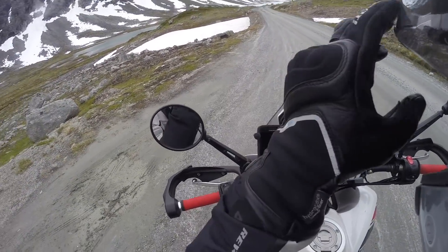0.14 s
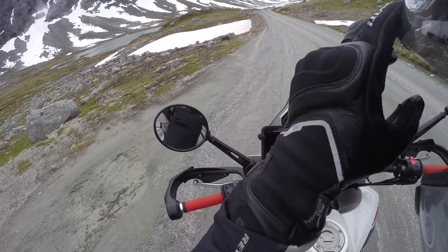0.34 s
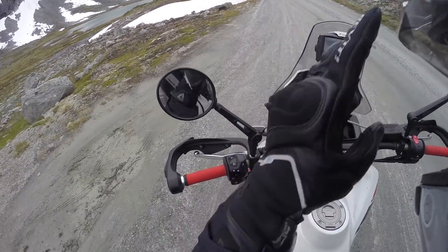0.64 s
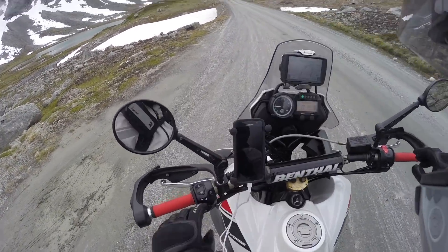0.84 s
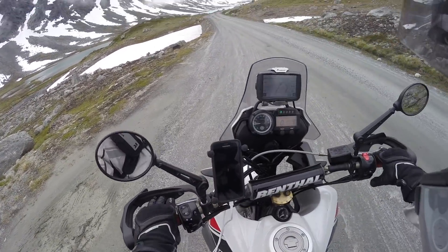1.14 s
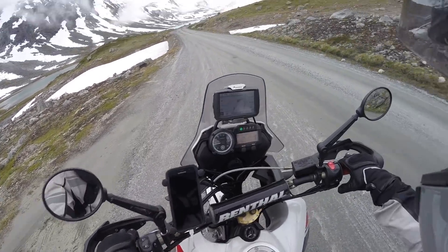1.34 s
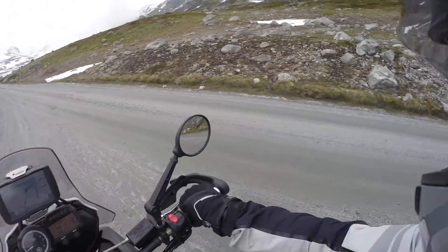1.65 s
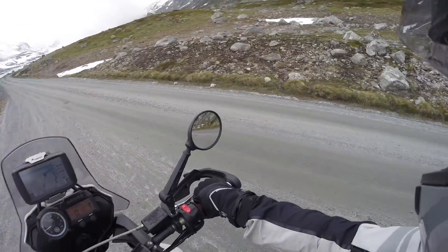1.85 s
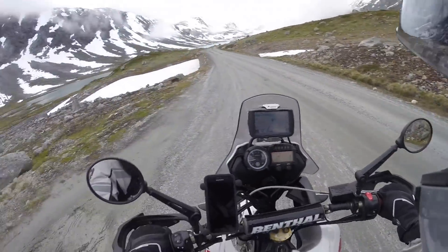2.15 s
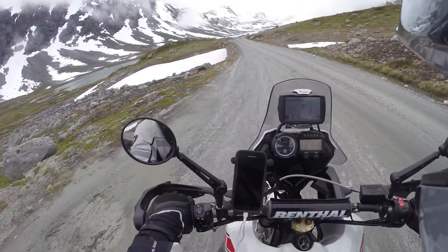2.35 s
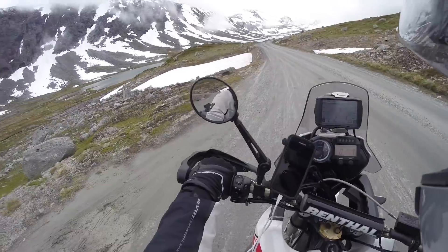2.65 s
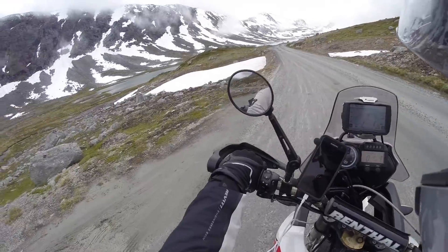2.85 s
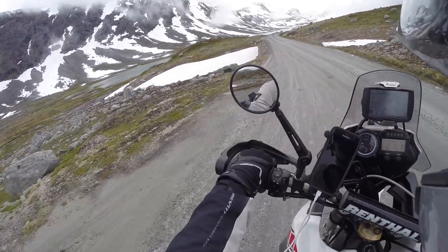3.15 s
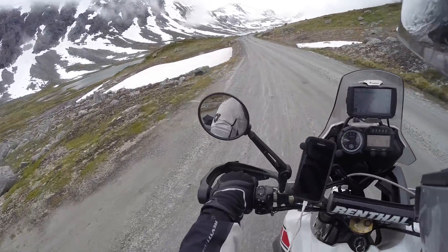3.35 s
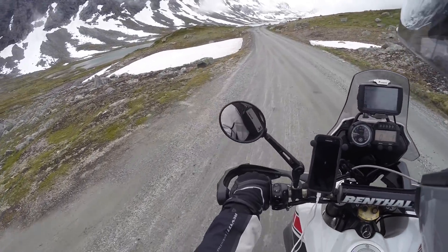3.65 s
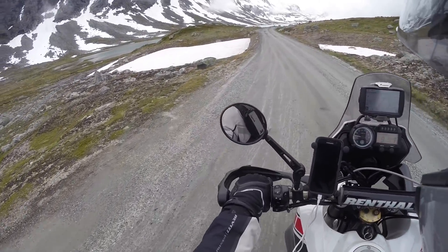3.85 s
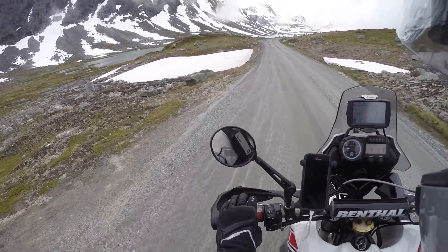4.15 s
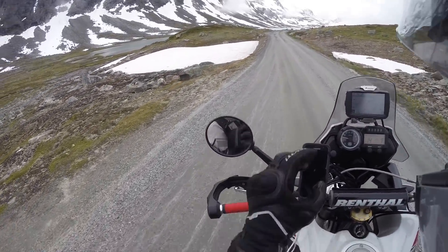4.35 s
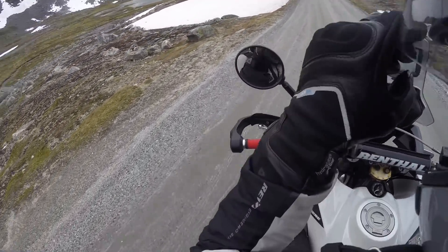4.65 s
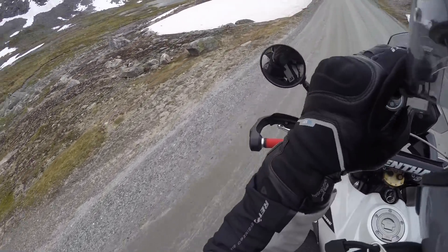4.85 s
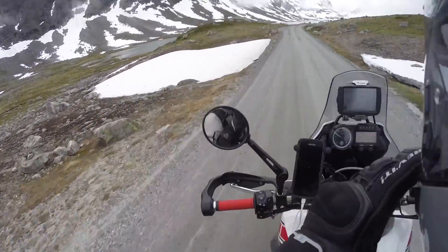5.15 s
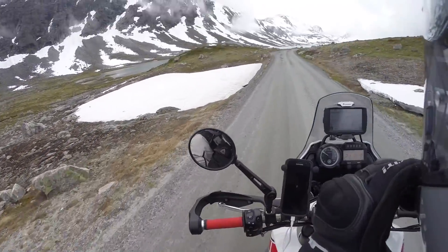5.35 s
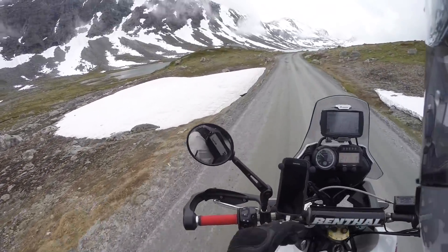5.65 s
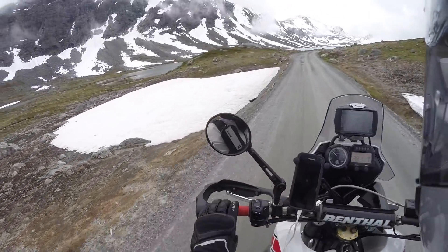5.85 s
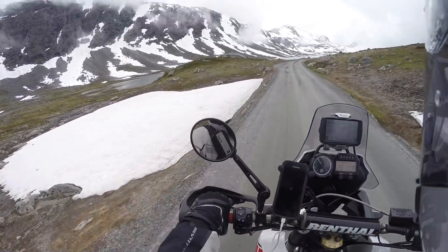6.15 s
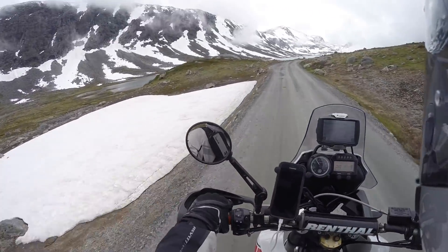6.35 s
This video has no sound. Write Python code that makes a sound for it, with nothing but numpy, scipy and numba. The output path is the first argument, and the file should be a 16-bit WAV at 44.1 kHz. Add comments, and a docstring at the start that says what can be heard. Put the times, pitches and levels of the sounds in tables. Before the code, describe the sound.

A big single-cylinder motorcycle idles lumpily with glove knocks, pulls away honking and speeds up, then a visor clacks shut and wind builds.

```python
"""A big single-cylinder motorcycle idles, pulls away and speeds up, heard at two ports on the rider's helmet.
Firings ring the exhaust pipe; the intake honks under throttle; the engine clatters as pulsed, filtered noise.
Wind is low noise with gusts. A glove rubs and knocks the helmet and shuts the visor; air thumps the ports.
Short squeaks fall in pitch as the clutch bites. Gain control ducks peaks and soft clipping rounds the rest.
"""
import sys
import numpy as np
from scipy import signal
from scipy.fft import rfft, irfft, next_fast_len
from scipy.io import wavfile
from scipy.ndimage import uniform_filter1d
from numba import njit

SR = 44100
rng = np.random.default_rng(int(sys.argv[2]) if len(sys.argv) > 2 else 0)


def materialize(psi):
    """Save the field psi as 16-bit PCM at rate SR to the path in sys.argv[1].

    A 1-D psi becomes a single channel; in a 2-D psi each row is a channel.
    """
    bounded = np.clip(np.atleast_2d(psi).T, -1, 1)
    quanta = np.round(bounded * 32767).astype(np.int16)
    wavfile.write(sys.argv[1], SR, quanta)


N = 286071

# All levels in dB are relative within their source unless stated otherwise.
# Engine speed. Each row: time in seconds, firings per second.
SPEED_CURVE = [(0.0, 12.73), (0.56, 13.1), (0.79, 13.91), (1.13, 12.94), (1.7, 12.84), (2.15, 13.41),
               (2.31, 18.96), (2.52, 19.16), (3.05, 20.32), (3.45, 17.95), (3.62, 15.74), (3.89, 18.33),
               (4.2, 21.6), (4.53, 24.4), (4.96, 27.4), (5.39, 30), (5.63, 31.9), (5.96, 33.5),
               (6.49, 35.9)]
# Throttle. Each row: time in seconds, opening 0-1, pipe pitch factor as the gas heats,
# factor on the pipe's t60, intake level in dB.
THROTTLE_CURVE = [(0, 0, 1, 1, -14), (2.15, 0, 1, 1, -14), (2.35, .95, .97, 1, -9), (3.1, .95, .97, 1, -8),
                  (3.5, .85, .94, 1, -9), (3.8, .9, .93, 1, -10), (4.3, .95, 1.02, 1.6, -3),
                  (4.6, .95, 1.025, 2.4, -3), (6.49, .95, 1.033, 2.4, -4)]
# Engine levels. Each row: time in seconds, exhaust level in dB, clatter level in dB.
ENGINE_LEVELS = [(0, -20.5, -32.5), (0.9, -21.5, -31.5), (1.2, -21, -33), (1.5, -22, -33.5),
                 (1.8, -25, -35), (2.1, -18, -31.5), (2.3, -22.5, -32), (2.5, -19.5, -28),
                 (2.9, -22.5, -29.5), (3.35, -22, -32), (3.6, -22.5, -31.5), (3.8, -21, -30),
                 (4.0, -26.5, -34.5), (4.2, -28.5, -32.5), (4.33, -24, -26), (4.6, -37, -31),
                 (4.8, -25.5, -20), (4.9, -30.5, -24), (5.12, -37, -37.5), (5.4, -32.5, -35),
                 (5.7, -28, -35.5), (5.9, -28, -31), (6.1, -25.5, -29), (6.33, -23.5, -26),
                 (6.49, -27, -25.5)]
# Treble against the clatter. Each row: time in seconds, level in dB.
TREBLE_LEVELS = [(0, -3.5), (1.2, -5), (2.1, -2.5), (2.4, -7.5), (3.5, -7), (4.2, -5.5), (4.6, -6.5),
                 (5.1, -7.5), (5.7, -4), (6.0, -6), (6.2, -7.5), (6.49, -6)]
# Exhaust modes. Each row: base frequency in Hz, base t60 in seconds, level in dB at shut throttle,
# level in dB at open throttle, polarity.
PIPE_MODES = [(77.4, 0.084, -10, -40, 1), (95, 0.11, -21, -17, 1), (140, 0.16, -9, -18.5, -1),
              (163, 0.019, 3.5, -40, 1), (232.3, 0.11, -8, -40, 1), (244, 0.036, -42, -2, 1),
              (318, 0.06, -41, -18.5, 1)]
# Intake modes. Each row: base frequency in Hz, t60 in seconds, level in dB with visor open, level in dB shut.
INTAKE_MODES = [(382, 0.15, -30, -11), (542, 0.15, 3, -19)]
# Casing modes struck by gulp and slam. Each row: frequency in Hz, t60 in seconds, level in dB.
CASING_MODES = [(770, 0.095, -15), (1070, 0.17, -19), (1292, 0.058, -4.5)]
# Airbox boom. Each row: time in seconds, level in dB.
BOOM_LEVELS = [(4.25, -30), (4.55, 0), (5.1, 0), (5.2, -30)]
# Valve ticks. Each row: place in the cycle 0-1, level in dB idling, level in dB pulling in the mids,
# level in dB pulling in the treble.
VALVE_TICKS = [(0.09, 6, -10, -10), (.3, -10, -10, 8), (0.504, 7, 10, 5), (.7, 0, -3, -7), (0.904, 1, 4, 3),
               (.98, -3, 7, 4)]
# Clatter spectrum through the helmet. Each row: frequency in Hz, spectral level in dB.
SHELL_SPECTRUM = [(180, 29), (300, -4.5), (410, -3.5), (500, 1.5), (906, -9.5), (1090, -7.5), (1560, -18.5),
                  (2210, -25.5), (3070, -28), (3940, -32), (4720, -31), (9280, -36.5), (12500, -40.5),
                  (14000, -46.5), (15500, -99)]
# Likeness of the two ports. Each row: frequency in Hz, likeness (clipped to 0-1).
PORT_LIKENESS = [(300, 5), (640, 13), (1400, 0.3), (3000, .5), (7000, 0.38), (15000, -0.5)]
# Balance of the clatter. Each row: frequency in Hz, left minus right in dB.
PORT_LEAN = [(60, 0.5), (110, 10), (200, -2), (380, -0.5), (700, -2.0), (1290, -6.5), (2380, 2), (4400, 1),
             (8120, 4.5), (15000, 1)]
# Helmet shell modes. Each row: frequency in Hz, level in dB, t60 in seconds.
HELMET_MODES = [(605, 2.5, 0.022), (1393, 8.5, 0.0053), (1940, 3, 0.0046), (2630, -4, 0.003),
                (3390, -16.5, 0.0092), (4720, -15, 0.0023)]
# Glove knocks. Each row: start in seconds, level in dB, t60 of the noise in seconds,
# left minus right in dB, hardness in dB per octave.
GLOVE_KNOCKS = [(0.2613, -6, 0.03, -4, 3), (1.4351, -22.5, 0.023, -1.5, 0), (1.553, -21.5, 0.55, -9, 0),
                (1.717, -19.5, 0.068, 6, 0), (1.7275, -9.5, 0.04, 2, 0), (2.098, -17, 0.02, -8, 1.5),
                (4.692, -21, 0.031, -9, 0), (4.732, -18, 0.044, 3, 0), (4.7874, 6, 0.022, 6, -1.5),
                (4.7925, -3, 0.019, 6, -1.5), (4.9563, -13.5, 0.076, 1, -1.5), (5.043, -13, 0.024, 3, 1.5),
                (5.0555, -12, 0.02, -2, 0), (5.0585, -3, 0.022, -2, 0), (5.067, -20, .02, 0, 0),
                (5.087, -22, 0.021, 3, 1.5), (5.0984, -5, 0.013, -2.5, 0), (5.1018, -11, .025, 5, 1.5),
                (5.127, -9.5, 0.049, 3, 0), (5.375, -31, 0.036, -7, 1.5), (5.419, -25, 0.027, -12, 0),
                (5.4385, -32, .02, 2, 1.5), (5.444, -27, 0.03, -3, 1.5), (5.452, -27, .015, 0, 1.5),
                (5.459, -8, 0.018, -8, 1.5), (5.5614, -21.5, 0.016, -13, 0), (5.5776, -26.5, 0.098, 1, 1.5),
                (6.417, -31, 0.067, -17, 0)]
# Cloth rubs. Each row: start in seconds, length in seconds, level in dB.
CLOTH_RUBS = [(0.034, 0.66, -37), (1.487, 0.23, -34.5), (4.592, 0.32, -37), (4.9, 0.23, -33.5)]
# Blows of pressure on the ports. Each row: start in seconds, level in dB, time scale in seconds,
# direction (1 push, -1 pull).
PRESSURE_THUMPS = [(0.263, -2, .004, 1), (3.556, 6, 0.0053, 1), (4.011, 2, 0.0081, 1),
                   (4.412, 12, 0.005, -1), (5.048, 1, 0.0013, 1), (5.1276, 13.5, 0.0011, 1),
                   (5.46, 11, 0.001, -1), (5.749, -5, 0.0022, -1), (5.8355, -8, 0.0017, 1),
                   (5.891, -4, 0.0013, -1), (5.8978, 0, 0.0023, 1), (6.011, -3, 0.0013, -1),
                   (6.016, -5, 0.0013, 1), (6.034, 3, 0.0028, 1), (6.079, -5, 0.0024, 1),
                   (6.163, -6, 0.0015, 1), (6.262, 1, 0.0013, -1), (6.331, 3.5, 0.0027, 1),
                   (6.385, 4, 0.0036, 1), (6.4195, 6, 0.0024, 1)]
# Roar of the air stream. Each row: time in seconds, level in dB.
ROAR_LEVELS = [(0, -31), (3, -31), (3.6, -25.5), (4.1, -25), (4.4, -22), (4.7, -24.5), (5.05, -27.5),
               (5.3, -24.5), (5.7, -23.5), (6.0, -19), (6.49, -14)]
# Strong gusts. Each row: centre in seconds, level in dB, half length in seconds (down to 1/e).
STRONG_GUSTS = [(1.202, -16, 0.32), (3.447, -18, 1), (4.046, -31, 0.072), (4.397, -12, 0.15),
                (4.9, -37, 0.14), (5.39, -22.5, 0.074), (5.906, -24, 0.17), (6.37, -19, 0.15)]
# Squeaks as the clutch bites. Each row: start in seconds, level in dB, start frequency in Hz,
# fall in Hz per second, length in seconds.
CLUTCH_SQUEAKS = [(2.008, -29, 1290, 1500, .025), (2.082, -27, 1270, 100, .02),
                  (2.157, -26, 1360, 4600, .065)]

PORT_LAG_SAMPLES = 4
CYCLE_AT_START = .342
LOAD_SCATTER = .3  # share of the idle scatter left at full throttle
GULP_AT_CYCLE, SLAM_AT_CYCLE = -.478, -.035  # intake gulp, intake valve slam
HONK_FLAT, HONK_SLIDE_S = 0.42, 0.0051  # starts this fraction flat, slides up as the valve closes
SLAM_HZ, SLAM_T60_S, SLAM_DB = 432, 0.036, 6
BOOM_HZ, BOOM_T60_S = 174, .12
SHAKE_DB = -2  # against the exhaust level curve
TICKS_BLUR_HZ = 23.6  # firings per second where the ticks blur into the rattle
PULL_HOLLOW_DB, SHUT_HOLLOW_DB = -6, -4.0  # 700 Hz band: full throttle, visor shut
VISOR_SHUTS_S = 5.12, 5.14
SHUT_EXHAUST_DB, SHUT_CLATTER_DB, SHUT_TREBLE_DB, SHUT_BUFFET_DB = -5.5, -4.5, -3.5, -22
SHUT_RASP_DB, SHUT_HISS_DB = 1.5, -5.5  # 2.8 kHz and 11.2 kHz bands
BUFFET_DB = 6  # above the roar curve
RUB_FADE_S = 0.024
LIMIT_DB, ATTACK_S, RELEASE_S = -3, .0004, 0.13
TOP_HZ = 15300


def undb(db):
    """Decibels to amplitude."""
    return 10 ** (np.asarray(db) / 20)


def unit(x):
    """Scale to unit RMS."""
    return x / np.sqrt(np.mean(x ** 2))


def curve(s, v):
    """Straight lines between points, at every sample."""
    return np.interp(np.arange(N) / SR, s, v)


def on_log(hz, table):
    """Table value on a log frequency axis."""
    table_hz, value = np.transpose(table)
    return np.interp(np.log(hz), np.log(table_hz), value)


@njit
def ring(x, pole):
    """A decaying mode struck by x; its pole may move."""
    y, z = np.empty(len(x)), 0j
    for i in range(len(x)):
        z = z * pole[i] + x[i] + 1e-18
        y[i] = z.imag
    return y


def mode(x, hz, t60_s):
    """A resonance of given pitch, falling 60 dB in t60."""
    pole = np.exp(2j * np.pi * hz / SR - np.log(1000) / (t60_s * SR))
    return ring(x, pole * np.ones(len(x)))


def clicks(s, size):
    """Pulses of given size at times s, shared between neighbouring samples."""
    at = np.clip(s * SR, 0, N - 2)
    k = at.astype(int)
    kept = size * (s > 0) * (s * SR < N - 2)
    return np.bincount(k, kept * (1 - at + k), N) + np.bincount(k + 1, kept * (at - k), N)


def walk(rate_hz):
    """Random levels held for 1 / rate and slewed twice; spread near 1."""
    k = int(SR / rate_hz)
    steps = np.repeat(rng.standard_normal(N // k + 1), k)
    return 1.3 * uniform_filter1d(uniform_filter1d(steps, k), k)[:N]


def ports(x):
    """The right port hears a source a few samples late."""
    return np.array([x, np.roll(x, PORT_LAG_SAMPLES)])


def butter(x, order, hz, kind="low"):
    """Butterworth filter."""
    return signal.sosfilt(signal.butter(order, hz, kind, fs=SR, output="sos"), x)


def cycles():
    """Firing cycles so far at every sample: the integral of engine speed."""
    return CYCLE_AT_START + np.cumsum(curve(*np.transpose(SPEED_CURVE))) / SR


def firings(place=0.):
    """Times at which each cycle passes the given place."""
    count = cycles()
    return np.interp(np.arange(int(count[-1]) + 1) + place, count, np.arange(N) / SR)


def throttle_at(s):
    """Throttle opening at times s."""
    return np.interp(s, *np.transpose(THROTTLE_CURVE)[:2])


def shut():
    """0 while the visor is open, 1 once it is shut."""
    return curve(VISOR_SHUTS_S, (0, 1))


def gusts():
    """Strength of the gusts: each swells and sinks like a bell."""
    t = np.arange(N) / SR
    return sum(undb(db) * np.exp(-((t - s) / half_s) ** 2) for s, db, half_s in STRONG_GUSTS)


def wind(speed_db):
    """Gusty low buffeting, partly the same on both ports, plus a rougher roar that reaches higher in pitch."""
    mid, side = rng.standard_normal((2, N))
    spread = 0.5 * side * np.array([[1], [-1]])
    low = butter(mid + spread, 2, [14, 55], "band")
    roar = butter(mid + 0.36 * spread, 1, [40, 115], "band")
    roar = butter(roar, 3, 340)
    buffet = np.hypot(undb(speed_db + BUFFET_DB + SHUT_BUFFET_DB * shut()), gusts())
    buffeting = unit(low) * buffet * undb(2.0 * walk(9.3))
    return buffeting + unit(roar) * undb(speed_db + 3.0 * walk(30))


def thumps():
    """One-sided pushes or pulls of air with a slight rebound."""
    out = np.zeros(N + 4410)
    for s, db, scale_s, sign in PRESSURE_THUMPS:
        k, t = int(s * SR), np.arange(4410) / SR / scale_s
        out[k:k + len(t)] += np.sign(sign) * undb(db) * (t * np.exp(1 - t)) ** 2 * (1 - 0.38 * t)
    return ports(out[:N])


def helmet(grit, hard_db):
    """Shell modes struck by noise; hardness tilts them about 1 kHz."""
    return sum(undb(db + hard_db * np.log2(hz / 1000)) * mode(grit, hz, t60_s)
               for hz, db, t60_s in HELMET_MODES)


def glove():
    """Scratchy knocks: a burst of noise coloured by the shell, with a bright edge."""
    out, t = np.zeros((2, N + 4410)), np.arange(4410) / SR
    for s, db, t60_s, pan_db, hard_db in GLOVE_KNOCKS:
        envelope = np.exp(-np.log(1000) * t / t60_s) * np.minimum(t / 0.0016, 1) ** 2
        grit = rng.standard_normal((2, len(t))) * envelope
        grit[0] = .7 * grit[1] + .7 * grit[0]  # ports partly alike
        body = np.array([helmet(g, hard_db) for g in grit])
        edge = butter(grit, 2, 8000)
        burst = body / np.abs(body).max() + undb(-13.5 + hard_db) * edge
        k = int(s * SR)
        out[:, k:k + len(t)] += burst * undb(db + np.array([[pan_db], [-pan_db]]) / 2)
    return out[:, :N]


def rubs():
    """Strength of the cloth rubbing: each rub fades in, holds and fades out."""
    t = np.arange(N) / SR
    return sum(undb(db) * np.clip(np.minimum(t - s, s + length_s - t) / RUB_FADE_S, 0, 1)
               for s, length_s, db in CLOTH_RUBS)


def squeaks():
    """Falling whistles that start quickly and fade."""
    out = np.zeros(N)
    for s, db, hz, fall, length_s in CLUTCH_SQUEAKS:
        k, t = int(s * SR), np.arange(int(length_s * SR)) / SR
        envelope = np.sin(np.pi * np.sqrt(t / length_s))
        out[k:k + len(t)] += undb(db) * envelope * np.sin(2 * np.pi * (hz - fall * t / 2) * t)
    return ports(out)


def valves():
    """Envelopes of the valve gear in mids and treble: uneven ticks that die in milliseconds."""
    ticks = 0
    for place, idle_db, mid_db, top_db in VALVE_TICKS:
        when = firings(place)
        time_scatter, level_scatter = rng.standard_normal((2, len(when)))
        opening = throttle_at(when)
        jittered = when + .001 * time_scatter
        ticks = ticks + np.array([
            clicks(jittered, undb(idle_db + (db - idle_db) * opening + 1.1 * level_scatter))
            for db in (mid_db, top_db)])
    decay = np.exp(-1 / (.005 * SR))
    return signal.lfilter([1], [1, -decay], uniform_filter1d(ticks, 90))


def shell_noise(hz, size):
    """Spectra of noise through the helmet: alike on both ports in the lows, less so in the highs."""
    like = np.clip(on_log(hz, PORT_LIKENESS), 0, 1)
    one, other = (rfft(rng.standard_normal(size)) for _ in range(2))
    late = np.exp(-2j * np.pi * hz * PORT_LAG_SAMPLES / SR)
    lean = undb(on_log(hz, PORT_LEAN) / 2)
    left = lean * (like * one + np.sqrt(1 - like ** 2) * other)
    return np.array([left, late * one / lean]) * undb(on_log(hz, SHELL_SPECTRUM))


def clatter(clatter_db, treble_db):
    """Engine noise in octave bands, pulsing with cycle and valve ticks; cloth rubs add to the treble."""
    once_a_cycle = np.cos(2 * np.pi * (cycles() - .75))
    ticks = valves() / (1 + (curve(*np.transpose(SPEED_CURVE)) / TICKS_BLUR_HZ) ** 4)
    opening, visor = throttle_at(np.arange(N) / SR), shut()
    size = next_fast_len(N)
    hz = np.maximum(np.arange(size // 2 + 1) * SR / size, 1)
    pair = shell_noise(hz, size)
    low, high, shared = 0, 0, walk(30)
    for centre_hz in 350 * 2. ** np.arange(6):
        window = np.cos(np.pi / 2 * np.clip(np.log2(hz / centre_hz), -1, 1)) ** 2
        band = irfft(pair * window, size)[:, :N]
        treble = centre_hz > 2000
        flutter_db = 1.42 * once_a_cycle + (.5 if treble else .7) * shared + .8 * walk(12)
        band = band * undb(flutter_db) * (1 + (1.3 if treble else .9) * ticks[int(treble)])
        band = band * undb({2800: SHUT_RASP_DB, 11200: SHUT_HISS_DB}.get(centre_hz, 0) * visor)
        if centre_hz < 400:
            band = band * (1 - .8 * opening)  # the loose idle burble tightens under throttle
        if centre_hz == 700:
            # thins under throttle; the shut visor closes off the hollow of the helmet
            band = band * undb(PULL_HOLLOW_DB * opening + SHUT_HOLLOW_DB * visor)
        if treble:
            high = high + band
        else:
            low = low + band
    rustle = np.hypot(undb(treble_db), rubs())
    return unit(low) * undb(clatter_db + 3.5) + unit(high) * undb(-6.0) * rustle


def shake(exhaust_db):
    """The crank's once-a-turn shake, two turns a cycle, through the shut helmet."""
    return shut() * undb(exhaust_db + SHAKE_DB) * np.sin(2 * 2 * np.pi * cycles())


def intake(size, opening, scatter, pitch):
    """The gulp honks and slides up in pitch; the valve slam rings a mode of its own; both ring the casing."""
    s, intake_db = np.transpose(THROTTLE_CURVE)[[0, 4]]
    level_db = np.interp(firings(), s, intake_db) + 1.5 * scatter * rng.standard_normal(len(size))
    honk = size * opening * undb(level_db)
    t, gulp_s = np.arange(N) / SR, firings(GULP_AT_CYCLE)
    since_s = np.clip(t - gulp_s[np.searchsorted(gulp_s, t) - 1], 0, None)
    slide = pitch * (1 - HONK_FLAT * np.exp(-since_s / HONK_SLIDE_S))
    gulp, slam = clicks(gulp_s, honk), clicks(firings(SLAM_AT_CYCLE), honk)
    out = undb(SLAM_DB) * mode(slam, SLAM_HZ, SLAM_T60_S)
    for hz, t60_s, open_db, shut_db in INTAKE_MODES:
        out = out + undb(open_db + (shut_db - open_db) * shut()) * mode(gulp, hz * slide, t60_s)
    for hz, t60_s, db in CASING_MODES:
        out = out + undb(db) * mode(slam + gulp, hz, t60_s)
    return out


def airbox(when, size):
    """Firings boom the airbox."""
    boom = size * undb(np.interp(when, *np.transpose(BOOM_LEVELS)))
    return mode(clicks(when, boom), BOOM_HZ, BOOM_T60_S)


def pipe(when, size, opening, scatter, pitch, linger):
    """A puff per firing rings the pipe, leaves the tailpipe inverted and returns from the silencer."""
    # under throttle the hot gas runs faster down the pipe
    hurry = (.97 / np.interp(when * SR, np.arange(N), pitch)) ** (2 * opening)
    back = when + (.0077 - .0009 * opening) * hurry
    tail = (1.15 + .08 * opening) * undb(.8 * scatter * rng.standard_normal(len(when)))
    rebound, echo = when + .0094 * hurry, 1.7 * opening
    out = 0
    for hz, t60_s, shut_db, open_db, sign in PIPE_MODES:
        puff = sign * size * (undb(shut_db) * (1 - opening) + undb(open_db) * opening)
        strike = clicks(when, puff) - clicks(back, tail * puff) + clicks(rebound, echo * puff)
        out = out + mode(strike, hz * pitch, t60_s * linger)
    return out


def exhaust(level_db):
    """Each firing, slightly uneven in time and strength, drives pipe, intake and airbox."""
    s, _, pitch, linger, _ = np.transpose(THROTTLE_CURVE)
    pitch, linger = curve(s, pitch), curve(s, linger)
    when = firings()
    opening = throttle_at(when)
    scatter = 1 - (1 - LOAD_SCATTER) * opening
    time_scatter, level_scatter = scatter * rng.standard_normal((2, len(when)))
    when = when - .0079 - .0036 * opening + .0002 * time_scatter
    size = undb(np.interp(when * SR, np.arange(N), level_db) + .9 * level_scatter)
    out = pipe(when, size, opening, scatter, pitch, linger)
    out = out + intake(size, opening, scatter, pitch) + airbox(when, size)
    soft = np.exp(-1 / (.0006 * SR))  # the valve takes a moment to open
    return ports(undb(16.0) * signal.lfilter([1 - soft], [1, -soft], out))


def scene():
    """Air, glove and engine as the two ports hear them."""
    s, exhaust_db, clatter_db = np.transpose(ENGINE_LEVELS)
    exhaust_db, clatter_db = curve(s, exhaust_db), curve(s, clatter_db)
    treble_db = clatter_db + curve(*np.transpose(TREBLE_LEVELS))
    visor = shut()
    around = wind(curve(*np.transpose(ROAR_LEVELS))) + thumps() + glove() + squeaks()
    engine = clatter(clatter_db + SHUT_CLATTER_DB * visor, treble_db + SHUT_TREBLE_DB * visor)
    engine = engine + shake(exhaust_db) + exhaust(exhaust_db + SHUT_EXHAUST_DB * visor)
    return around + engine


@njit
def duck(peak, top, attack, release):
    """Gain that holds the followed peak at the top: quick down, slow back."""
    gain, e = np.empty(len(peak)), 0.
    for i in range(len(peak)):
        e += (peak[i] - e) * (attack if peak[i] > e else release)
        gain[i] = top / max(e, top)
    return gain


def record(dry):
    """Gain control on the louder port, soft clipping of what slips through, no steady pressure, steep top cut."""
    louder = np.abs(dry).max(0)
    gain = duck(louder, float(undb(LIMIT_DB)), 1 / (ATTACK_S * SR), 1 / (RELEASE_S * SR))
    wet = butter(np.tanh(dry * gain), 1, 12, "high")
    return signal.sosfilt(signal.ellip(10, .2, 80, TOP_HZ, fs=SR, output="sos"), wet)


dry = scene()
out = record(dry)
materialize(out)
```